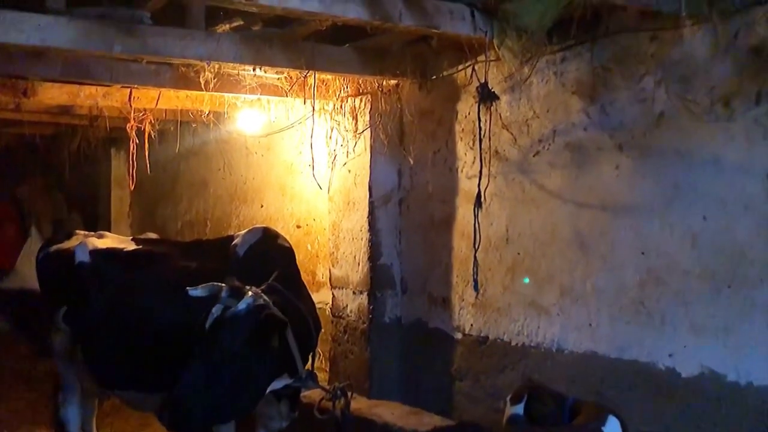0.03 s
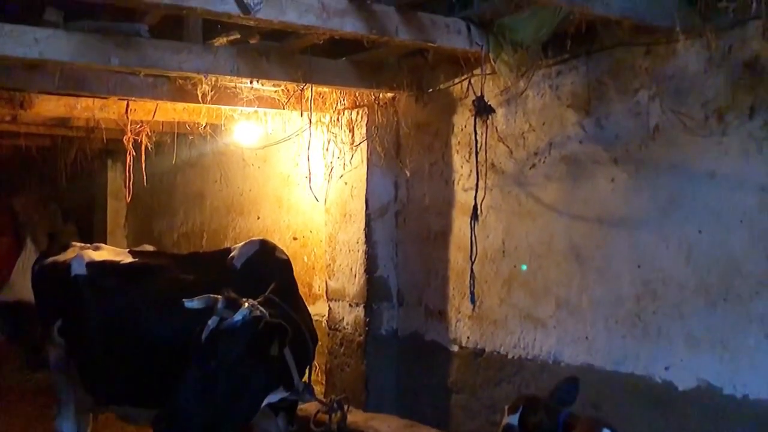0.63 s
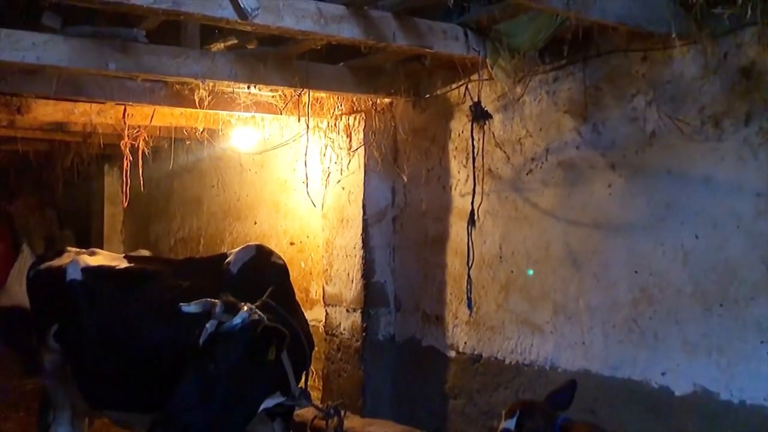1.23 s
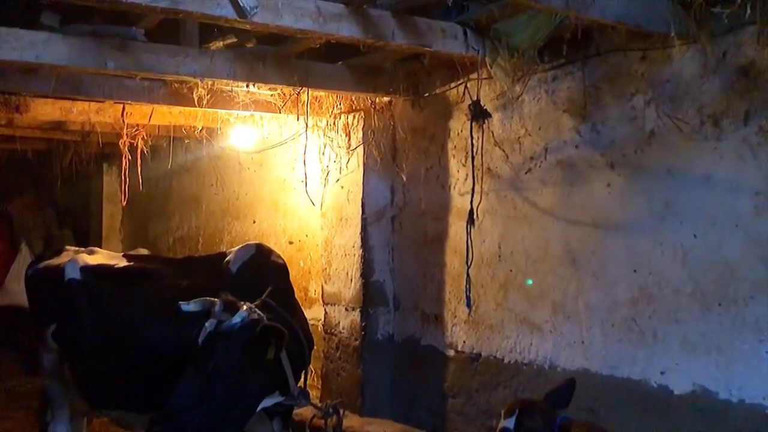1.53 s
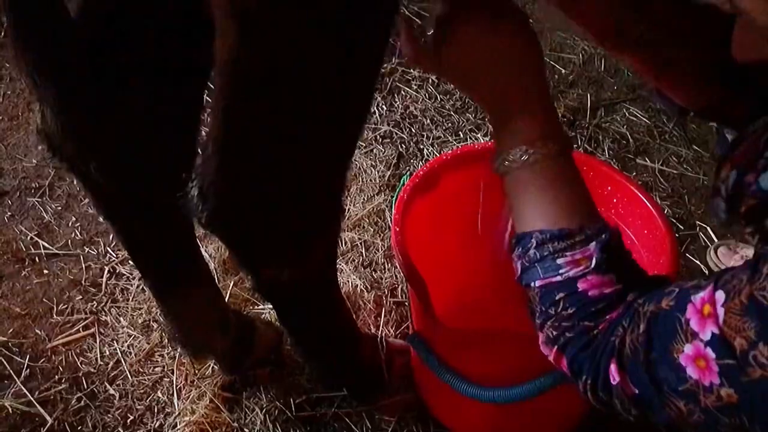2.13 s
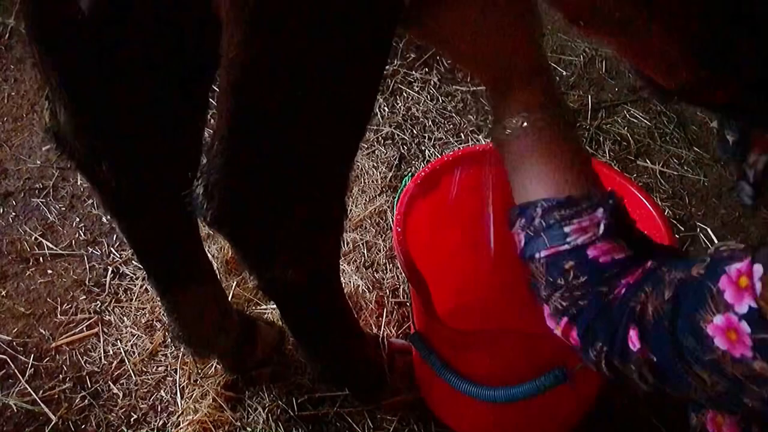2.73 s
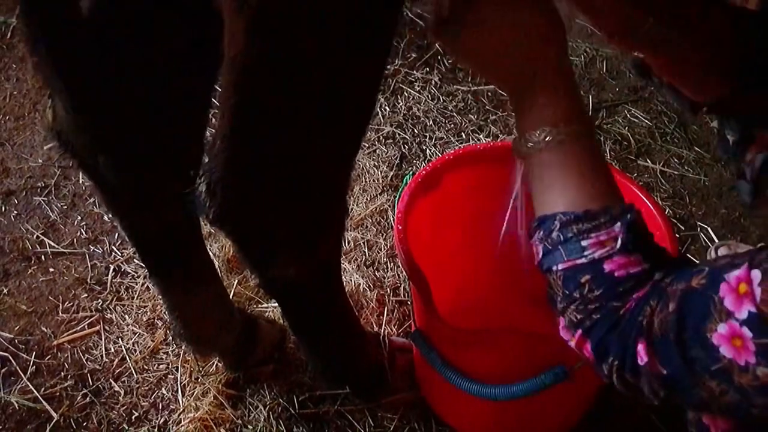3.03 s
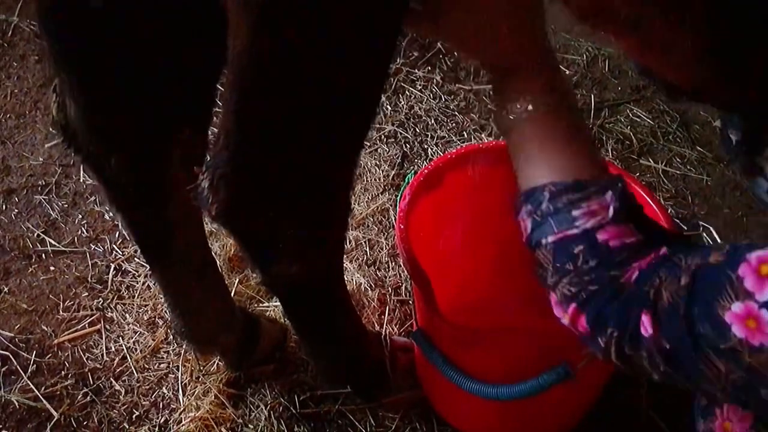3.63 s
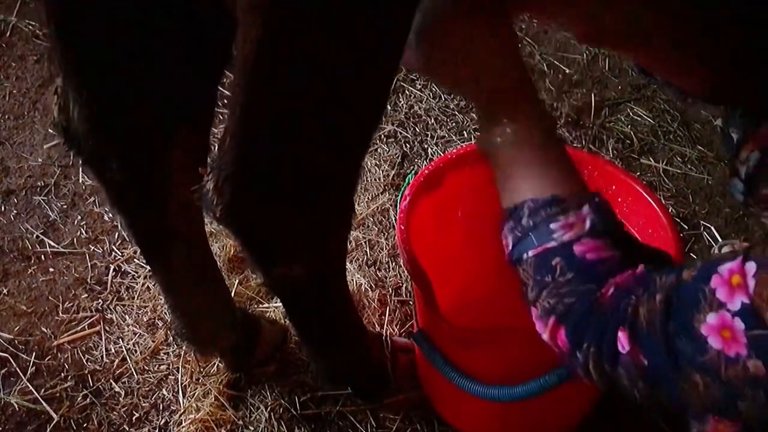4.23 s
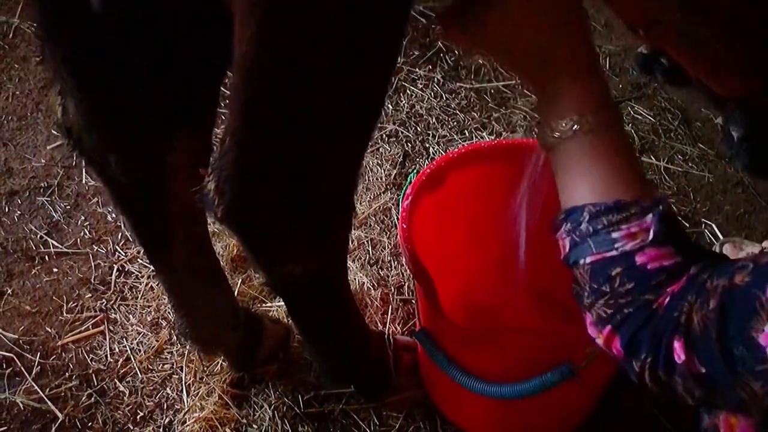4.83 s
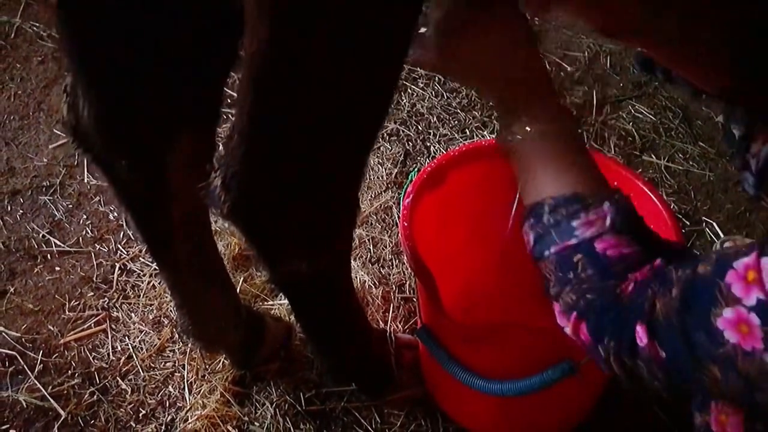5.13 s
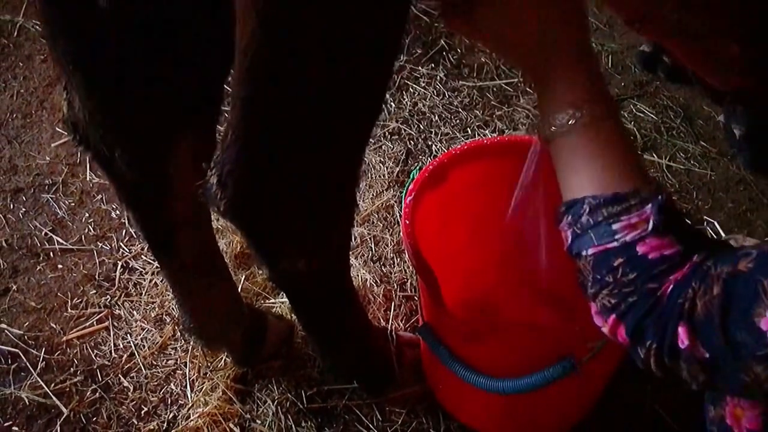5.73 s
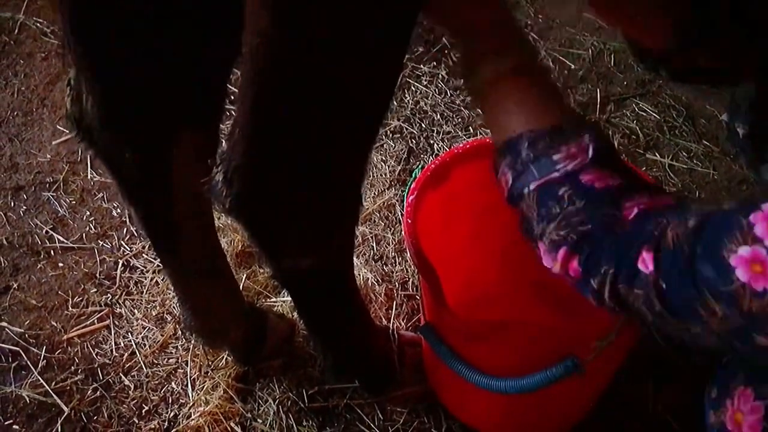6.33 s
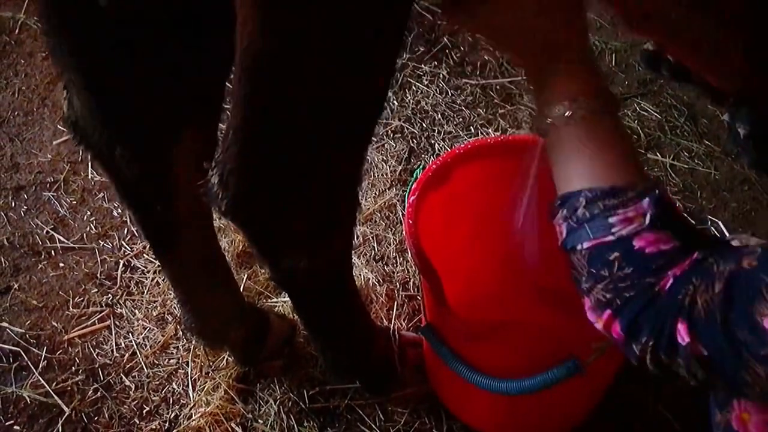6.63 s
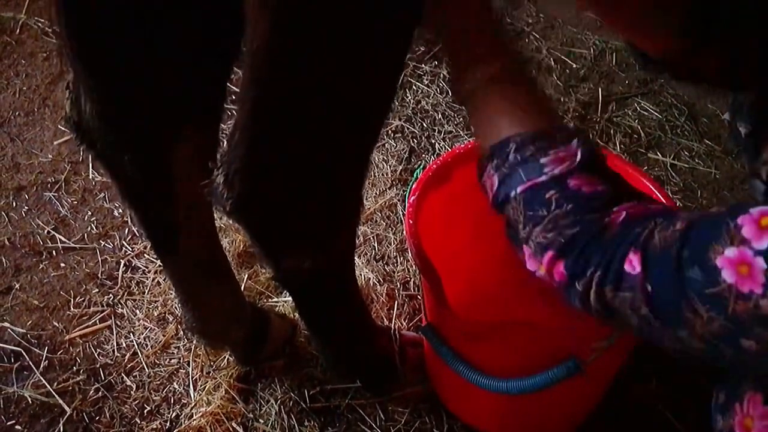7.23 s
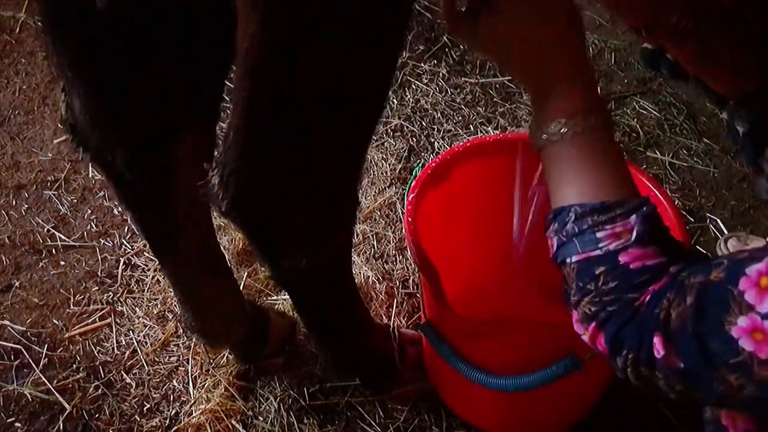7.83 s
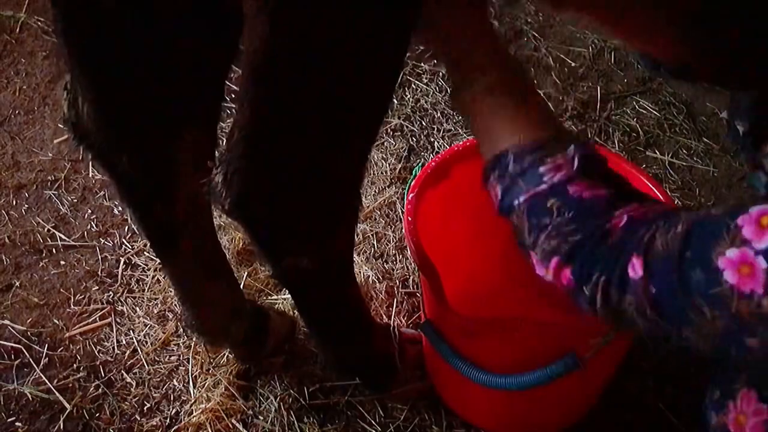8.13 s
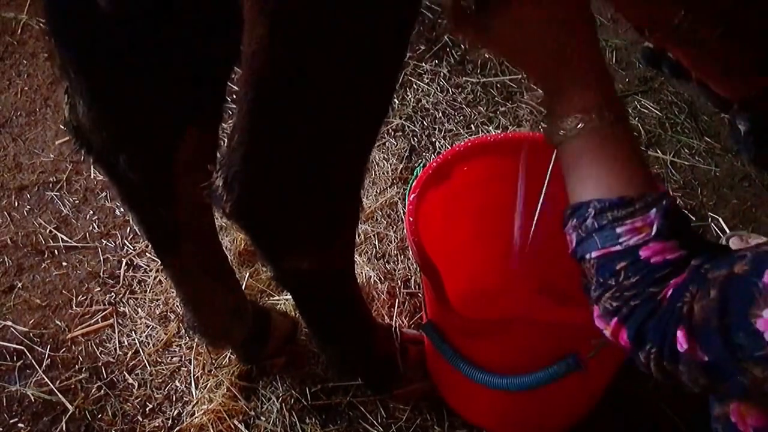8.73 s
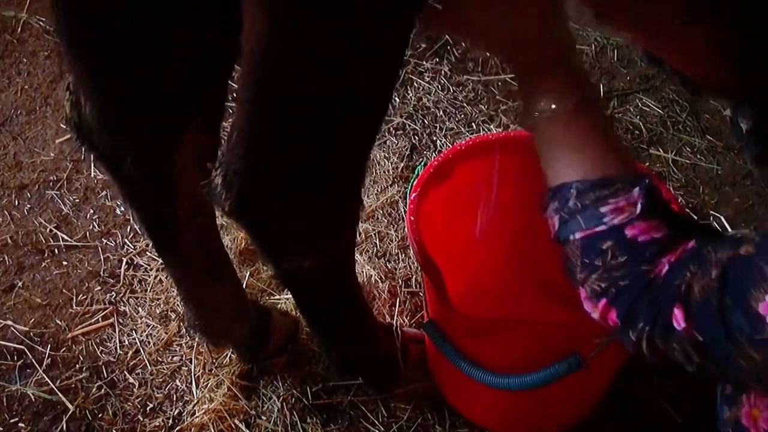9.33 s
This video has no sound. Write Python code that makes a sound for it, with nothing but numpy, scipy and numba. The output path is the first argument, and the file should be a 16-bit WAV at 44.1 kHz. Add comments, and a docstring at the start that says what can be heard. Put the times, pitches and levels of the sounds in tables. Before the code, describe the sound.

A cow is milked by hand: after a quiet start, eight long, hissing squirts land in a plastic bucket about once a second.

```python
"""In a quiet shed, a cow is milked by hand into a plastic bucket. Soft rustles and a faint whistle
precede eight long squirts. Each jet breaks into drops, which hiss on the froth, entrain bubbles that
resonate in the milk, and drive the modes of the bucket. Fat drops splat now and then, short wet ticks
and spits fall in and between the squirts, and two dull knocks come near the end."""
import sys
import numpy as np
from scipy import signal
from scipy.fft import rfft, irfft
from scipy.io import wavfile
from scipy.ndimage import uniform_filter1d
from numba import njit

SR = 44100
rng = np.random.default_rng(int(sys.argv[2]) if len(sys.argv) > 2 else 0)


def to_wav(s):
    """Save 16-bit WAV."""
    ch = np.atleast_2d(s).T  # columns
    pcm = np.round(np.clip(ch, -1, 1) * 32767)  # PCM
    wavfile.write(sys.argv[1], SR, pcm.astype(np.int16))


N = 413216
T = np.arange(N) / SR

# Levels in the tables are relative; each source applies its own gain.
# Spectrum of the air of the shed: f/Hz, level/dB
AIR_SPECTRUM = [(15, -49.5), (25, -21.5), (74, -3.5), (212, -13), (236, -12), (489, -15), (641, -18.5),
                (1040, -23), (2050, -32), (16000, -42.5)]
# Distant rustles: t/s, level/dB, centre f/Hz, swell/s, fade/s
RUSTLE_EVENTS = [(.2, -62, 3500, .006, 0.012), (.233, -47, 3780, 0.004, 0.024),
                 (.425, -59, 1400, .0054, 0.022), (.677, -53, 3260, 0.016, 0.039),
                 (1.107, -64, 3600, .003, .012), (1.137, -53.5, 3430, 0.0076, 0.02),
                 (1.568, -59, 1880, 0.0073, 0.038), (1.886, -55, 900, .008, 0.025)]
# Course of the whistle: t/s, f/Hz, level/dB
WHISTLE_TRACK = [(.6, 7900, -89), (.9, 7980, -80), (1.25, 8220, -76), (1.6, 8350, -74), (1.92, 8250, -79)]
# Short wet ticks and spits in and between the squirts, the last as a new squirt begins:
# t/s, level/dB, f/Hz, t60/s
WET_TICKS = [(1.909, -27.5, 3070, 0.18), (1.96, -13.5, 6500, 0.048), (2.4134, -31, 7440, 0.068),
             (2.5561, -46, 14900, 0.054), (3.308, -20, 11000, .035), (3.434, -33, 12600, .092),
             (4.396, -35, 13800, 0.1), (5.1846, -28, 11900, .044), (6.315, -43, 13000, 0.049),
             (6.347, -38, 12200, .053), (7.1253, -23, 5550, 0.038), (7.7213, -4.5, 14000, 0.02),
             (7.975, -18, 14100, 0.044), (8.093, -33, 5930, 0.036), (8.204, -42, 11100, 0.15),
             (9.169, -38, 10900, 0.056), (9.3565, -25.5, 11800, 0.21)]
# A brief silence: start t/s, end t/s
SILENT_SPAN = (1.922, 1.942)
# Pulls on the teat, later times counted from the onset: onset t/s, spit/dB, spray/dB, spray eases t/s,
# plunge begins t/s, plunge/dB, plunge ends t/s, surge t/s, sag t/s, sag/dB, trill t/s, trill/dB,
# bubble f/Hz, drumming/dB
PULLS = [(1.945, -31.5, -32, 0.24, .075, -26, 0.35, .14, .22, -8, 0.36, -36.5, 1596, -21.5),
         (2.692, -35, -30.5, 0.38, 0.049, -25.5, .48, 0.31, 0.28, -3.5, 0.47, -38, 1807, -24.5),
         (3.662, -21, -30, 0.36, .05, -26.5, 0.46, 0.2, .27, 2.5, 0.43, -32, 1890, -21),
         (4.598, -31, -29, 0.36, 0.0894, -24, 0.44, 0.18, 0.26, -4, 0.42, -29.5, 1799, -23),
         (5.551, -16, -30.5, 0.36, .14, -27, 0.5, .22, 0.19, -2, 0.41, -30.5, 2110, -22),
         (6.515, -17, -30.5, 0.36, .14, -25, 0.46, 0.19, 0.21, -4.5, 0.45, -33.5, 1956, -23),
         (7.471, -23.5, -29.5, 0.34, .11, -26.5, 0.48, 0.35, 0.41, -12, 0.48, -35.5, 1956, -23.5),
         (8.409, -27, -30.5, 0.37, 0.14, -26.5, .45, 0.31, .37, -2, 0.443, -30, 1752, -21)]
# Modes of the plastic wall: f/Hz, bandwidth/Hz, level/dB
WALL_MODES = [(553, 44, -3.5), (678, 36, -3), (743, 77, -1), (867, 80, 2), (954, 100, 1), (1050, 78, 1),
              (1178, 160, -2.5), (1435, 130, -3.5), (1537, 170, 0.5), (1940, 130, -6), (2593, 150, -5)]
# Hollow modes of the bucket and the air in it: f/Hz, bandwidth/Hz, level/dB
HOLLOW_MODES = [(133, 18, -8.5), (214.3, 24, -2.5), (269.3, 24, 3.5), (300.2, 22, 3), (336.7, 20, -3),
                (445.8, 25, -3.5)]
# Spectrum of spray on the froth: f/Hz, level/dB
SPRAY_SPECTRUM = [(450, -9), (800, 2.5), (2000, 2.5), (3300, 5.5), (5500, -1), (8000, -3), (11000, -1.5),
                  (14000, 2.5), (16000, 1.5)]
# Impacts of the fattest drops: t/s, level/dB, cavity f/Hz
DROP_IMPACTS = [(2.086, -19, 1150), (2.227, -15, 1660), (2.867, -11, 1490), (3.859, -12.5, 1060),
                (4.022, -12.5, 2620), (4.672, -13.5, 2000), (4.778, -11, 1600), (4.796, -9.5, 1870),
                (4.955, -5, 2020), (4.972, -8, 2320), (5, -7, 2970), (5.592, -26, 1460),
                (5.708, -8.5, 5640), (5.755, -10, 2960), (5.774, -10, 1460), (5.866, -3.5, 3190),
                (6.004, -8.5, 2680), (6.279, -34.5, 1300), (6.841, -4, 3870), (6.849, -4.5, 6350),
                (7.7, -2, 2150), (7.739, -4.5, 4480), (7.74, -5, 1540), (7.867, -9, 2720),
                (8.568, -10, 1610), (8.696, -7, 6200), (8.815, -8, 2730)]
# First short dips of a jet into the milk: t/s, level/dB
JET_DIPS = [(5.6, -31.5), (6.535, -47), (6.591, -37), (7.5, -50.5), (8.445, -31.5)]
# Dull knocks: t/s, level/dB, f/Hz
KNOCK_EVENTS = [(8.308, -38.5, 167), (9.149, -37.5, 524)]


def undb(db):
    """Amplitude ratio of a level in decibels."""
    return 10 ** (np.asarray(db) / 20)


def unit(x):
    """Normalisation to an rms of 1."""
    return x / np.sqrt(np.mean(x ** 2) + 1e-18)


def hump(age, length):
    """Gaussian envelope, 1 at age 0."""
    return np.exp(-(age / length) ** 2)


def ramp(age, length):
    """Linear rise from 0 to 1."""
    return np.clip(age / length, 0, 1)


def walk(rate):
    """Smooth random fluctuation with a standard deviation near 1."""
    hold = int(SR / rate)
    steps = np.repeat(rng.standard_normal(N // hold + 1), hold)
    return 1.25 * uniform_filter1d(uniform_filter1d(steps, hold), hold)[:N]


def low_cut(x, hz):
    """Fourth-order high-pass filter."""
    return signal.sosfilt(signal.butter(4, hz, "high", fs=SR, output="sos"), x)


def colour(x, spectrum):
    """Minimum-phase filter with a given spectrum (f/Hz, level/dB)."""
    hz, db = np.transpose(spectrum)
    f = np.maximum(np.fft.rfftfreq(8192, 1 / SR), 1)
    cepstrum = irfft(np.log(undb(np.interp(np.log(f), np.log(hz), db))))
    cepstrum[1:len(f) - 1] *= 2
    cepstrum[len(f):] = 0
    return signal.fftconvolve(x, irfft(np.exp(rfft(cepstrum))))[:N]


def resonate(x, hz, width_hz):
    """Second-order resonator with unit gain at its centre."""
    hz = min(hz, .45 * SR)
    return signal.lfilter(*signal.iirpeak(hz, hz / min(width_hz, SR / 4), fs=SR), x)


def patter(rate, spread_db):
    """Shot noise: independent impacts, many small and a few large."""
    hit = rng.random(N) < rate / SR
    size_db = spread_db * np.minimum(rng.standard_exponential(N), 6)
    return unit(hit * rng.choice([-1, 1], N) * undb(size_db))


@njit
def damped_sines(start, hz, cycles, size, glide):
    """Free oscillations that swell within a cycle, then glide and fall 60 dB over the given cycles."""
    out = np.zeros(N)
    for k in range(len(start)):
        first, length = int(start[k] * SR), int(cycles[k] * SR / hz[k]) + 1
        amplitude, phase = size[k], 0.
        decay = np.exp(-6.9 / length)
        for i in range(min(length, N - first)):
            phase += 2 * np.pi * hz[k] * (1 + glide * i / length) / SR
            out[first + i] += amplitude * np.sin(phase) * phase ** 2 / (9 + phase ** 2)
            amplitude *= decay
    return out


def echoes(x, t60, dull_hz):
    """Reverberation: dense reflections decay exponentially."""
    t = T[:SR // 2]
    tail = rng.standard_normal(len(t)) * np.exp(-np.log(1000) * t / t60) * (t > .0015)
    low_pass = signal.butter(1, dull_hz, fs=SR, output="sos")
    return signal.fftconvolve(x, signal.sosfilt(low_pass, tail / np.linalg.norm(tail)))[:N]


def shed_air(level_db=-58.5, waver_db=-.43):
    """Ambient noise: a low rumble under slight, slow amplitude modulation."""
    return undb(level_db + waver_db * walk(4.4)) * unit(colour(rng.standard_normal(N), AIR_SPECTRUM))


def rustles(width=.68, scratch_db=3, t60=.19):
    """Swells of band-limited shot noise, distant enough to lose treble and reverberate."""
    straw = colour(patter(9000, 2.2), [(200, 28), (1500, 7.5), (5000, 5.5), (9000, 3.5), (15000, 7)])
    out = np.zeros(N)
    for s, db, hz, swell, fade in RUSTLE_EVENTS:
        envelope = np.exp(-np.maximum((s - T) / swell, (T - s) / fade))
        out += undb(db) * envelope * unit(resonate(straw, hz, width * hz))
    out *= undb(scratch_db * walk(129.9))
    return out + undb(-1.5) * echoes(out, t60, dull_hz=4500)


def whistle(width_hz=260):
    """Random modulation broadens a slowly gliding tone into a narrow hiss."""
    s, hz, db = np.transpose(WHISTLE_TRACK)
    tone = np.sin(2 * np.pi * np.cumsum(np.interp(T, s, hz)) / SR)
    return undb(np.interp(T, s, db, left=-140, right=-140)) * unit(tone * walk(2 * width_hz))


def bursts(rows, width):
    """Fine spray as decaying shot noise; width is the fractional bandwidth."""
    out, spray = np.zeros(N), low_cut(patter(9000, 3.8), 700)
    for s, db, hz, t60 in rows:
        first = int(s * SR)
        burst = unit(resonate(spray[first:first + SR // 5], hz, width * hz))
        decay = np.exp(-np.log(1000) * T[:len(burst)] / t60)
        out[first:first + len(burst)] += undb(db) * burst * decay
    return out


def ticks_and_spits(spit_hz=7500, spit_t60=.035):
    """Broadband transients: wet ticks fall in and between squirts, and each jet opens with a spit."""
    spits = [(start, db, spit_hz, spit_t60) for start, db, *_ in PULLS]
    return undb(-9) * bursts(WET_TICKS, width=.64) + undb(-10) * bursts(spits, width=1)


def squeeze(open_s=.0024, dig_s=.032, graze_db=-27.5, surge_db=4, dribble_db_per_s=-155):
    """The flow from the teat sets the envelopes of the jet's sounds and the pitch of its bubbles."""
    plunge, spray, drum, trill, pitch = np.zeros((5, N))
    for (start, _, spray_db, eases, digs, plunge_db, ends,
         surges, sags, sag_db, trills, trill_db, hz, drum_db) in PULLS:
        now = T >= start
        age = np.minimum(T[now] - start, 1)
        opening = ramp(age, open_s)
        # The spray swells as the fist closes and dies ever faster as the teat empties.
        closing = ramp(age, .13)
        emptying = np.maximum(age - eases, 0) / .33
        spray[now] = opening * undb(spray_db - 11.5 * (1 - closing) - 36 * emptying ** 1.57)
        # The jet grazes the milk, digs in with uneven force and dribbles out.
        grazing = 1 - ramp(age - digs + dig_s, dig_s)
        effort_db = surge_db * hump(age - surges, .03) + sag_db * hump(age - sags, .013)
        dribble = np.maximum(age - ends, 0)
        depth_db = graze_db * grazing + dribble_db_per_s * dribble
        plunge[now] = opening * undb(plunge_db + depth_db + effort_db)
        # The bucket drums from the first drops to the last.
        swell_db = 5.5 * (ramp(age, .12) - .5)
        fade_db = -81 * np.maximum(age - ends + .064, 0)
        drum[now] = opening * undb(drum_db + swell_db + fade_db)
        trill[now] = undb(trill_db) * hump(age - trills, .048)
        # Bubbles are small while the jet grazes, shrink as it thins and grow in the dribble.
        octaves = .4 * grazing + .55 * (age - ends / 2) - 2.2 * dribble
        pitch[now] = hz * 2 ** octaves
    return plunge, spray, drum, trill, np.where(pitch > 0, pitch, pitch[pitch > 0].mean())


def bubbles(pitch, count, octaves, cycles, spread_db, glide):
    """Minnaert resonance: entrained bubbles ring, the smaller the higher, and the froth damps them."""
    start = rng.random(count) * T[-1]
    detune, polarity, life = rng.standard_normal((count, 3)).T
    hz = np.clip(np.interp(start, T, pitch) * 2 ** (octaves * detune), 600, 9000)
    size = np.sign(polarity) * undb(spread_db * np.minimum(rng.standard_exponential(count), 4))
    return unit(low_cut(damped_sines(start, hz, cycles * np.exp(.44 * life), size, glide), 690))


def plops(pitch, count=420, octaves=.6, cycles=15, spread_db=3):
    """Stray larger drops each excite a heavily damped, rising oscillation."""
    jitter, detune, strength = rng.standard_normal((count, 3)).T
    start = (np.arange(count) + .5 + .5 * np.tanh(jitter)) * T[-1] / count
    hz = np.clip(np.interp(start, T, pitch) * 2 ** (octaves * detune), 700, 7000)
    rings = damped_sines(start, hz, cycles * np.ones(count), undb(spread_db * strength), glide=.062)
    return unit(low_cut(rings, 390))


def bucket(force, modes, drift=.022):
    """Forced vibration of modes that wander as the milk sloshes and the arm moves over the mouth."""
    ring = sum(undb(db) * resonate(resonate(force, hz, width), hz, width) for hz, width, db in modes)
    return np.interp(T + np.cumsum(drift * walk(5)) / SR, T, ring)


def droplets(count, low_hz, high_hz, cycles, spread_db):
    """Impulsive excitation: tiny droplets burst, each with a high, damped ping."""
    when, height, rarity = rng.random((count, 3)).T
    size = undb(spread_db * np.minimum(-np.log(rarity), 4))
    hz = low_hz + (high_hz - low_hz) * height
    return unit(damped_sines(when * T[-1], hz, cycles * np.ones(count), size, glide=0.))


def jet(sputter_db=1.21, gurgle_db=1.92, flicker_db=2.5, usual_hz=2000):
    """Jet break-up: the stream sputters into drops that plunge, drum and spray."""
    plunge, spray, drumming, trill, pitch = squeeze()
    fine = np.minimum(pitch / usual_hz, 1.6)  # a thinner jet makes smaller bubbles and rattles less
    froth = undb(-5.5) * bubbles(.9 * pitch, count=15000, octaves=.595, cycles=17, spread_db=3, glide=.08)
    gurgle = undb(-13) * bubbles(2350 * fine, count=3600, octaves=.24, cycles=40, spread_db=6, glide=.072)
    # Late in the pull the thinning jet trills in its own hole, in small bubbles of like size.
    ringing = bubbles(np.full(N, 2617), count=7000, octaves=.3, cycles=49, spread_db=3.5, glide=.06)
    waver = undb(gurgle_db * walk(45))
    milk = waver * (plunge * (froth + gurgle + undb(-13.5) * plops(pitch)) + trill * ringing)
    # Plunge and spray rattle the wall; the hollow boom outlasts both.
    wall = bucket(patter(4000, 1.73), WALL_MODES) * (undb(2.5) * plunge / fine + undb(6.5) * spray)
    boom = bucket(patter(4000, 1.7), HOLLOW_MODES) * drumming
    hiss_gain = spray * undb(.46 + flicker_db * walk(260))
    hiss = hiss_gain * unit(low_cut(colour(patter(12000, 3), SPRAY_SPECTRUM), 330))
    fizz = undb(-4) * spray * droplets(count=20000, low_hz=2714, high_hz=16680, cycles=36, spread_db=2.5)
    thread = undb(-22) * spray ** .66  # the last thread of milk fades more slowly than the spray
    sizzle = thread * droplets(count=2600, low_hz=3500, high_hz=10800, cycles=22, spread_db=4)
    return undb(sputter_db * walk(70)) * (milk + wall + boom + hiss + fizz) + sizzle


def splats(cavity_cycles=15, crack_hz=5000, crack_cycles=7.5):
    """Impact and cavity resonance: a fat drop cracks on the milk, and the hole it punches rings."""
    s, db, hz = np.array(DROP_IMPACTS, float).T.copy()
    each = np.ones(len(s))
    cavity = damped_sines(s, hz, cavity_cycles * each, undb(db + 2), glide=.11)
    crack = damped_sines(s, crack_hz * each, crack_cycles * each, undb(db - 2), glide=0.)
    return low_cut(cavity + crack, 500)


def gulps(length_s=.018, hz=1650):
    """Brief air entrainment: some jets dip into the milk for a moment before they dig in."""
    dips = sum(undb(db) * hump(T - s, length_s) for s, db in JET_DIPS)
    return dips * bubbles(np.full(N, hz), count=7000, octaves=.4, cycles=27, spread_db=3, glide=.09)


def knocks(cycles=10, glide=-.6):
    """Heavily damped low oscillations of falling pitch are heard as soft knocks."""
    s, db, hz = np.array(KNOCK_EVENTS, float).T.copy()
    return damped_sines(s, hz, cycles * np.ones(len(s)), undb(db), glide)


def scene():
    """Superposition: the milk sounds reflect inside the bucket, then faintly round the shed."""
    milk = jet() + gulps() + splats() + ticks_and_spits()
    milk += undb(-10) * echoes(low_cut(milk, 1200), t60=.032, dull_hz=4000)
    sources = milk + rustles() + knocks()
    room = undb(-19) * echoes(sources, t60=.3, dull_hz=3500)
    return (sources + room + whistle() + shed_air())[None]


def record(dry, top_hz=15950):
    """Gating and band limiting: an instant of silence before the first squirt, and a steep treble cut."""
    gate = uniform_filter1d(1. * ((T < SILENT_SPAN[0]) | (T > SILENT_SPAN[1])), size=100)
    return signal.sosfilt(signal.ellip(10, .2, 70, top_hz, fs=SR, output="sos"), dry * gate)


dry = scene()
out = record(dry)
to_wav(out)
```